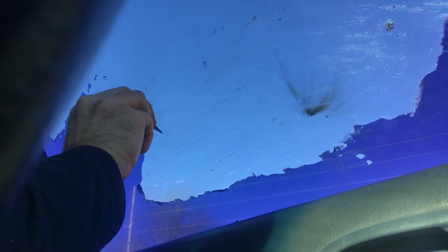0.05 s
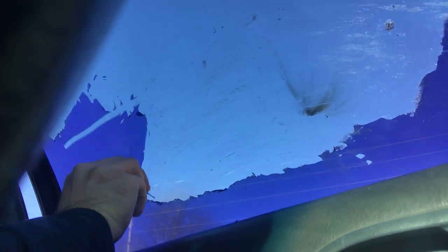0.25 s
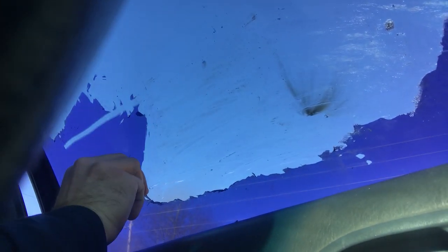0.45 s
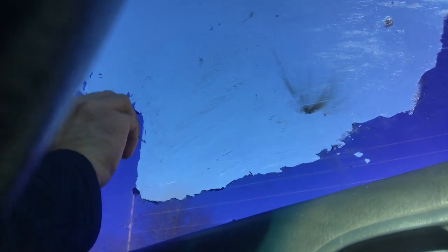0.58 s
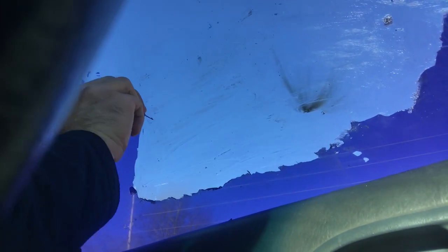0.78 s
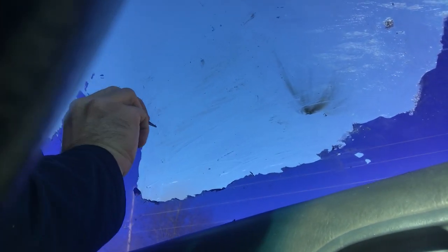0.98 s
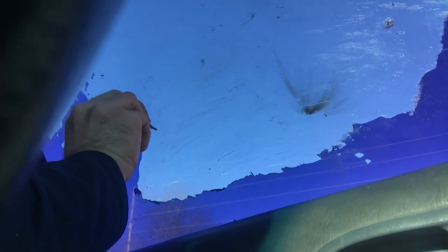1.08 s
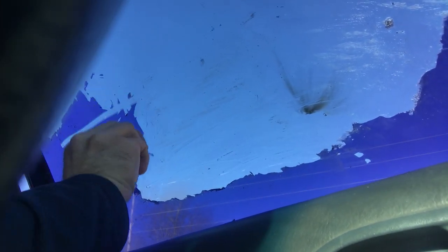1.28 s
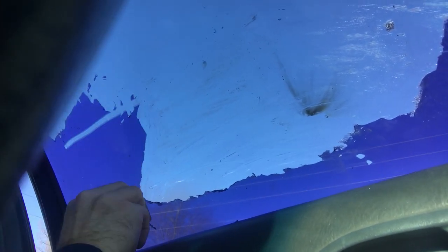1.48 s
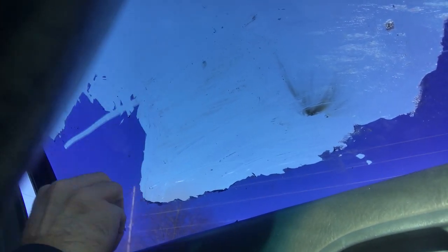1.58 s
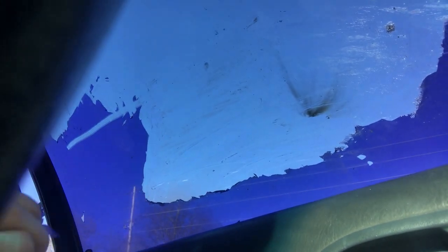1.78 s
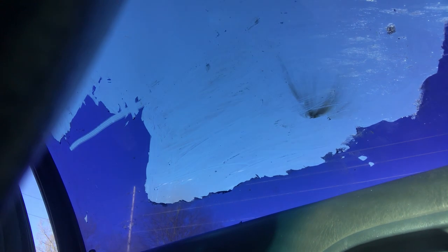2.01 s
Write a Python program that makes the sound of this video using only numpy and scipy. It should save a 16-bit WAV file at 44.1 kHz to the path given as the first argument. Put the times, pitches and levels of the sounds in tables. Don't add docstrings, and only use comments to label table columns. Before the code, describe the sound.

Close inside a parked car, a thin blade clicks and scrapes on glass, two brief rasping strokes separated by irregular taps and soft pane thumps, ending in small clatter over faint traffic rumble and hiss.

```python
import sys
import numpy as np
from scipy import signal
from scipy.fft import rfft, irfft, next_fast_len
from scipy.io import wavfile
from scipy.ndimage import uniform_filter1d, map_coordinates

SR = 44100
rng = np.random.default_rng(int(sys.argv[2]) if len(sys.argv) > 2 else 0)


def wav_record(signal):
    frames = np.transpose(np.atleast_2d(signal))
    bounded = np.clip(frames, -1, 1)
    quanta = np.round(bounded * 32767).astype(np.int16)
    wavfile.write(sys.argv[1], SR, quanta)


def convert_level_to_amplitude(level_db):
    exponent = np.asarray(level_db, float) / 20
    return 10 ** exponent


N = 90404

# time_s, level_db
TRAFFIC_LEVEL = [
    (0, -48.5),
    (.5, -52.5),
    (1.2, -48),
    (1.58, -48),
    (2.05, -53.5),
]
# frequency_hz, level_db
RUMBLE_SPECTRUM = [(15, -44), (28, -6), (55, -2), (100, -3.5), (150, -13.5), (220, -18), (400, -33.5),
                   (700, -71)]
# frequency_hz, level_db
HISS_SPECTRUM = [(150, -60), (250, -4.5), (367, -5.5), (460, -8.5), (723, -13.5), (2440, -20),
                 (2670, -21.5), (3460, -21), (16000, -39.5)]
# start_s, peak_db, treble_lift_db, low_mode_lift_db
TAPS = [(.002, -34, -6, 2), (.0365, -31, 1, 3), (.1355, -27, 0, 0), (.2012, -21, -13, 0),
        (.5527, -34, 7, 6), (.5757, -36, 3, 4), (.6617, -34, 0, 5), (.7565, -53, -8, 10),
        (.792, -29, 5, -8), (.8945, -35, 6, 1), (.9125, -41, 2, 5), (.937, -47, 0, 3), (.9707, -36, 7, 5),
        (1.0065, -49, 0, -4), (1.0225, -32, 2, 3), (1.0355, -42, 8, 6), (1.0748, -23, 3, -1),
        (1.1375, -43, -2, 2), (1.3715, -33, -6, 0), (1.382, -29, 5, -2), (1.566, -43, 8, -2),
        (1.5902, -25, -1, 0), (1.606, -31, -1, 2), (1.8062, -35, 5, 7)]
# start_s, peak_db, treble_lift_db, low_mode_lift_db
CHATTER = [
    (1.677, -46, 7, 3),
    (1.696, -43, 6, 2),
    (1.7085, -45, 5, 2),
    (1.720, -47, 4, 2),
    (1.731, -49, 0, 2),
]
# pitch_hz, level_db, t60_s
BLADE_MODES = [(520, -19, .03), (900, -17, .022), (1210, -8, .022), (1600, -8, .016), (2100, -1, .017),
               (2300, -1, .016), (2600, -3, .011), (2970, -1, .01), (3600, -6, .01), (4400, -11, .009),
               (6060, -12, .012), (6700, -15, .008), (8600, -24, .007)]
# frequency_hz, level_db
CRACK_SPECTRUM = [(300, -18), (700, 0.5), (2700, -0.5), (5000, -7.5), (9000, -18), (16000, -32)]
# start_s, level_db, pitch_hz, t60_s
GLASS_NOTES = [(.037, -45, 1224, 0.016), (.136, -33, 2143, 0.019), (.2015, -25.5, 3635, 0.019),
               (.553, -38, 1900, 0.021), (.576, -46.5, 2000, 0.04), (.6625, -36, 2020, 0.015),
               (.7565, -50, 1200, 0.025), (.7925, -33, 2560, 0.017), (.895, -39, 3350, 0.014),
               (.913, -42, 2010, 0.02), (.971, -51, 2100, 0.021), (1.023, -38, 3050, 0.009),
               (1.036, -49.5, 1183, 0.078), (1.0752, -28.5, 2975, 0.015), (1.0755, -56, 2180, 0.016),
               (1.148, -48.5, 1590, 0.028), (1.372, -48, 1830, 0.034), (1.382, -38.5, 917, .04),
               (1.5905, -29.5, 2990, 0.016), (1.6065, -40, 2040, 0.015), (1.807, -39, 935, 0.023)]
# start_s, level_db, pitch_hz, t60_s
THUMPS = [(0.135, -30.5, 181, 0.064), (0.2012, -8.5, 169, 0.028), (0.22, -28.5, 263, 0.057),
          (.356, -35.5, 238.3, 0.12), (.358, -37, 487, 0.072), (.41, -35, 55, 0.36),
          (0.797, -20.5, 146, 0.047), (0.936, -30.5, 169, 0.043), (1.049, -28, 131, 0.039),
          (1.077, -21, 167, 0.037), (1.138, -25.5, 137.5, 0.04), (1.177, -41.5, 109.5, 0.29),
          (1.378, -22.5, 419, 0.044), (1.3756, -23, 98.8, 0.2), (1.38, -26, 189, 0.052),
          (1.466, -28.5, 102, 0.28), (1.4705, -13.5, 176, 0.034), (1.506, -25, 93, 0.082),
          (1.59, -20, 156, 0.036), (1.607, -30, 83, 0.091), (1.664, -30, 87, 0.089),
          (1.841, -39, 153.4, 0.15)]
# time_s, pressure_db, treble_lift_db, singing_db
STROKES = [
    [(.204, -53, -2, -20), (.219, -42, 6, -2), (.227, -31.5, -4.5, 1), (.25, -40, 4, 6.5),
     (.278, -44.5, 10.5, 10.5), (.3, -44, 4, 5), (.335, -54.5, 9, 8.5), (.353, -52.5, 2, 7)],
    [(.353, -47, 6, -1), (.356, -35, -8, -1.5), (.37, -46.5, 1, 4.5), (.385, -39.5, -7, 0),
     (.396, -45.5, 0, 5), (.406, -65.5, 15, 13), (.425, -85, 0, -29)],
    [(1.369, -63, 2, 4), (1.373, -43.5, -21, -12), (1.385, -45, 8.5, -9), (1.42, -51, 12, 10),
     (1.463, -49, 8, 9), (1.467, -35, 3, -2), (1.49, -41, 3.5, 0), (1.505, -47, -8, -12),
     (1.54, -64, 7, -7)],
]
SING_WIDTHS = [1000, 1500, 800]
# time_s, pitch_hz
SING_PITCH = [(.2, 3500), (.24, 3150), (.275, 3400), (.3, 2900), (.325, 3500), (.36, 3050), (.4, 2900),
              (1.38, 2800), (1.41, 3200), (1.425, 3800), (1.455, 3900), (1.47, 3300), (1.5, 3000)]
# frequency_hz, level_db
RASP_SPECTRUM = [(250, -4), (400, -3.5), (1100, -4), (2400, -6), (4200, -8), (5200, -16), (8000, -20.5),
                 (16000, -44)]
# frequency_hz, width_hz, level_db
RESONANCES = [(2500, 300, 3), (4700, 300, 3), (7100, 400, 5), (8700, 250, 7), (10100, 250, 6),
              (11600, 250, 8)]
# frequency_hz, level_db
FLEX_SPECTRUM = [(60, 8), (120, 6), (300, 2.5), (550, -9), (1000, -39)]
# start_s,
# level_db, pitch_hz, t60_s
SNAGS = [(.2223, -31, 1060, 0.053), (.227, -27, 553, 0.017), (.238, -38, 2470, 0.016),
         (.2742, -27.5, 3380, 0.044), (.294, -34, 2590, .02), (.3555, -31.5, 1050, 0.027),
         (.3555, -33, 3240, 0.024), (.361, -27.5, 3130, 0.025), (.7935, -35.5, 3790, 0.024),
         (.598, -50, 1950, .015), (.604, -41.5, 1550, 0.018), (1.149, -40, 2750, .02),
         (1.384, -35, 2630, 0.029), (1.411, -34, 3220, 0.029), (1.4245, -37.5, 3790, 0.049),
         (1.4537, -38, 3850, 0.023), (1.4661, -31, 2540, 0.054), (1.4661, -33, 1320, 0.053),
         (1.469, -32, 3380, 0.046), (1.479, -27, 1107, 0.028), (1.6393, -44, 3500, 0.0071),
         (1.6558, -35.5, 1670, 0.014), (1.6603, -35.5, 6100, 0.0071), (1.662, -27.5, 2480, 0.008),
         (1.826, -39.5, 1810, 0.041), (1.8305, -39, 1250, 0.018), (1.8435, -38.5, 1420, .02),
         (1.932, -51, 1400, 0.016)]
# start_s, length_s, level_db, treble_lift_db
SCUFFS = [
    (0.594, 0.025, -46.5, -18),
    (0.804, 0.012, -56, 11),
    (0.905, 0.034, -54, 0),
    (1.145, 0.0066, -46, 5),
    (1.541, 0.077, -64, 10),
    (1.581, 0.021, -52, -2),
    (1.656, 0.025, -43, -8),
    (1.824, 0.036, -45, -6),
    (1.853, 1, -65.5, -2.5),
]
# frequency_hz, level_db
CRUMB_SPECTRUM = [(300, -3.5), (700, -0.5), (1700, -3), (3500, -8.5), (6000, -16.5), (14000, -39.5)]
# frequency_hz, t60_s
CABIN_DECAY = [(200, 0.16), (1500, 0.044), (12000, 0.026)]


def unit(x):
    return x / np.sqrt(np.mean(x ** 2) + 1e-20)


def along(points, hz):
    f, v = np.transpose(points)
    return np.interp(np.log(hz + 1), np.log(f + 1), v)


def wobble(rate):
    knots = rng.standard_normal(int(N * rate / SR) + 4)
    return map_coordinates(knots, [np.arange(N) * rate / SR])


def filtered(x, response):
    m = next_fast_len(x.shape[-1] + 8192)
    spectrum = rfft(x, m) * response(np.fft.rfftfreq(m, 1 / SR))
    return irfft(spectrum, m)[..., :x.shape[-1]]


def treble(x):
    tilt_hz = 3980
    return filtered(x, lambda hz: 1 / (1 + (tilt_hz / (hz + 1)) ** 4))


def coloured(points, count):
    return unit(filtered(rng.standard_normal(count), lambda hz: convert_level_to_amplitude(along(points, hz))))


def floor():
    hiss_db = -64
    rumble = unit(coloured(RUMBLE_SPECTRUM, N) * convert_level_to_amplitude(2.2 * wobble(14)))
    rumble_db = np.interp(np.arange(N) / SR, *np.transpose(TRAFFIC_LEVEL))
    return convert_level_to_amplitude(rumble_db) * rumble + convert_level_to_amplitude(hiss_db) * coloured(HISS_SPECTRUM, N)


def taps():
    tap_db, crack_s, rise_s, low_hz = -6.5, 0.0019, 0.00032, 2010
    travel_s = 0.001463
    mode_scatter_db, pitch_scatter = 2.2, .025
    out, t = np.zeros(N + SR), np.arange(SR // 10) / SR
    for start, peak_db, lift_db, low_db in list(TAPS) + list(CHATTER):
        crack_shape = np.exp(-t / crack_s) * (1 - np.exp(-3 * t / crack_s))
        hit = coloured(CRACK_SPECTRUM, len(t)) * crack_shape
        for hz, level_db, t60 in BLADE_MODES:
            strength, detune = rng.standard_normal(2)
            u = np.clip(t - travel_s * 1000 / hz, 0, 1)
            tilt_db = low_db / (1 + (hz / low_hz) ** 4)
            gain = convert_level_to_amplitude(level_db + tilt_db + mode_scatter_db * strength - 60 * u / t60)
            ring = np.sin(2 * np.pi * hz * (1 + pitch_scatter * detune) * u)
            hit = hit + gain * ring * (1 - np.exp(-u / rise_s))
        hit = hit + (convert_level_to_amplitude(lift_db) - 1) * treble(hit)
        out[round(start * SR):][:len(t)] += convert_level_to_amplitude(peak_db + tap_db) * hit
    return out[:N]


def brief_rings(events):
    rise_s, roughness = .0006, .7
    out, t = np.zeros(N + SR), np.arange(SR // 10) / SR
    for start, level_db, hz, t60 in events:
        jitter = uniform_filter1d(rng.standard_normal(len(t)), size=12)
        drift = roughness * np.sqrt(hz / SR) * np.cumsum(jitter)
        gain = convert_level_to_amplitude(level_db - 60 * t / t60) * (1 - np.exp(-t / rise_s))
        out[round(start * SR):][:len(t)] += gain * np.sin(2 * np.pi * hz * t + drift)
    return out[:N]


def glass_notes():
    return brief_rings(GLASS_NOTES)


def thumps():
    push_s, pane_cut_hz = .004, 50
    out, t = np.zeros(N + SR), np.arange(SR // 3) / SR
    for start, level_db, hz, t60 in THUMPS:
        upper = 0.41 * np.sin(2 * np.pi * 1.652 * hz * t) * convert_level_to_amplitude(-40 * t / t60)
        ring = -np.sin(2 * np.pi * hz * t) - upper
        gain = convert_level_to_amplitude(level_db - 60 * t / t60) * (1 - np.exp(-t / push_s))
        out[round(start * SR):][:len(t)] += gain * ring
    return filtered(out[:N], lambda hz: 1 / (1 + (pane_cut_hz / (hz + 1)) ** 4))


def rasp():
    grit_per_s, grit_spread_db, smooth_db = 6000, 2, 3
    draw = rng.random((N, 3))
    hits = draw[:, 0] < grit_per_s / SR
    sizes = convert_level_to_amplitude(-grit_spread_db * np.log(draw[:, 1] + 0.00073))
    grit = hits * sizes * np.sign(draw[:, 2] - .5)
    drive = unit(grit) + convert_level_to_amplitude(smooth_db) * rng.standard_normal(N)

    def response(f):
        resonance = 1
        for centre, width, db in RESONANCES:
            peak = 1j * f * width / (centre * centre - f * f + 1j * f * width)
            resonance = resonance + (convert_level_to_amplitude(db) - 1) * peak
        return convert_level_to_amplitude(along(RASP_SPECTRUM, f)) * resonance

    return unit(filtered(drive, response))


def patchy(x, depth_db):
    z = signal.stft(x, nperseg=256)[2]
    field = uniform_filter1d(rng.standard_normal(z.shape), size=4, axis=0)
    field = uniform_filter1d(field, size=8, axis=1)
    return signal.istft(z * convert_level_to_amplitude(depth_db * unit(field)), nperseg=256)[1][:N]


def scraping():
    flex_db = 1.5
    t = np.arange(N) / SR
    body, high, song = np.zeros((3, N))
    turn = np.exp(2j * np.pi * np.cumsum(np.interp(t, *np.transpose(SING_PITCH))) / SR)
    for stroke, width_hz in zip(STROKES, SING_WIDTHS):
        s, press_db, lift_db, sing_db = np.transpose(stroke)
        gain = convert_level_to_amplitude(np.interp(t, s, press_db, -120, -120))
        body = body + gain
        high = high + gain * convert_level_to_amplitude(np.interp(t, s, lift_db))
        a, b = filtered(rng.standard_normal((2, N)), lambda f: 1 / (1 + (2 * f / width_hz) ** 2))
        tone = unit(a * turn.real + b * turn.imag)
        song = song + gain * convert_level_to_amplitude(np.interp(t, s, sing_db) - 7 + 2 * wobble(300)) * tone
    sound = unit(patchy(rasp(), depth_db=2.2))
    top = treble(sound)
    bite = convert_level_to_amplitude(2.2 * wobble(250))
    flex = convert_level_to_amplitude(flex_db) * coloured(FLEX_SPECTRUM, N)
    return body * (bite * (sound - top) + flex) + high * np.sqrt(bite) * top + song


def snags():
    return brief_rings(SNAGS)


def scuffs():
    rise_s, fall_s, sag_db = 0.0024, 0.0037, 8.5
    crumb_rate, crumb_db = 300, 3.5
    t = np.arange(N) / SR
    sound = unit(coloured(CRUMB_SPECTRUM, N) * convert_level_to_amplitude(crumb_db * wobble(crumb_rate)))
    top, out = treble(sound), np.zeros(N)
    for start, length, level_db, lift_db in SCUFFS:
        u = t - start
        rise = np.clip(u / rise_s, 0, 1)
        sag = convert_level_to_amplitude(level_db - sag_db * np.clip(u / length, 0, 1))
        fall = np.exp(-np.clip(u - length, 0, 1) / fall_s)
        out = out + rise * sag * fall * (sound + (convert_level_to_amplitude(lift_db) - 1) * top)
    return out


def cabin(x):
    wall_s = .003
    out, hop = np.zeros(N + SR), SR // 10
    for start in range(0, N, hop):
        hz, t, z = signal.stft(rng.standard_normal(SR // 5), SR, nperseg=128)
        decay = convert_level_to_amplitude(-60 * t / along(CABIN_DECAY, hz)[:, None])
        tail = signal.istft(z * decay, SR, nperseg=128)[1]
        wet = signal.fftconvolve(x[start:start + hop], tail / np.linalg.norm(tail))
        out[start + round(wall_s * SR):][:len(wet)] += wet
    return out[:N]


def scene():
    cabin_db = -10.5
    work = taps() + glass_notes() + scraping() + snags() + scuffs()
    return (work + convert_level_to_amplitude(cabin_db) * cabin(work) + thumps() + floor())[None]


def band_limit(x):
    return signal.sosfilt(signal.butter(12, 16400, fs=SR, output="sos"), x)


def record(dry):
    low_cut_hz, top_hz = 35, 16200
    mix = filtered(dry, lambda hz: (hz < top_hz) * (1j * hz / (low_cut_hz + 1j * hz)) ** 2)
    return band_limit(mix)


dry = scene()
out = record(dry)
wav_record(out)
```